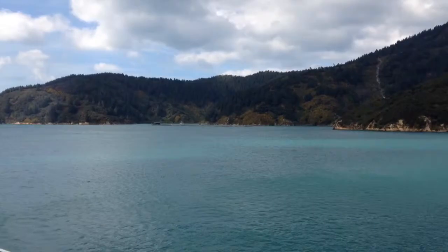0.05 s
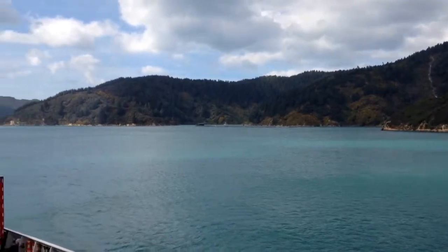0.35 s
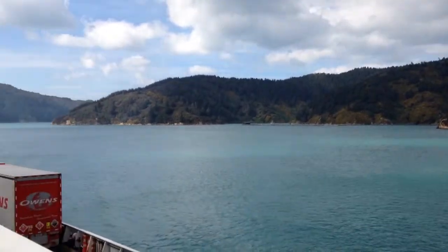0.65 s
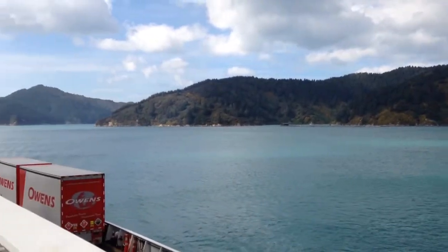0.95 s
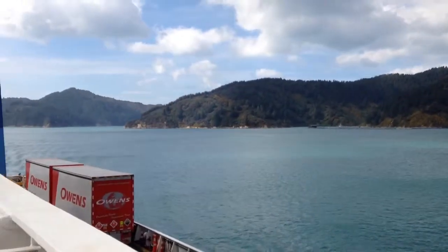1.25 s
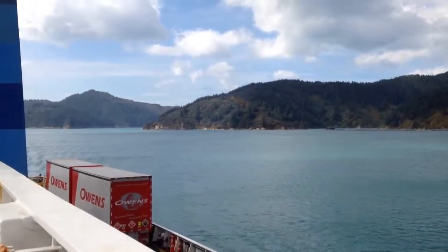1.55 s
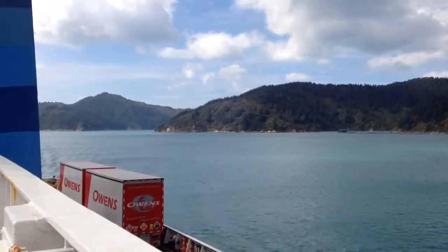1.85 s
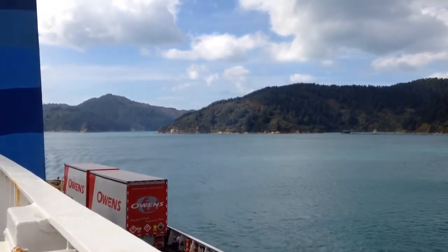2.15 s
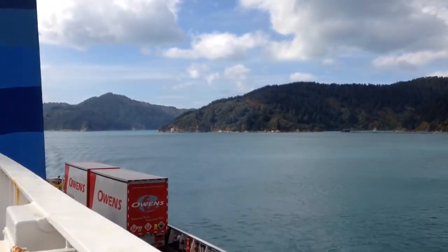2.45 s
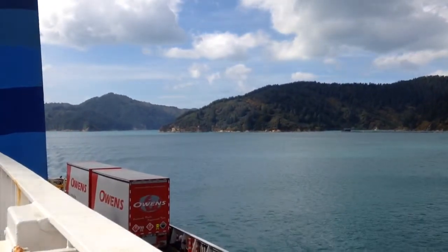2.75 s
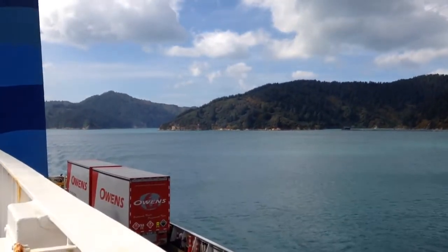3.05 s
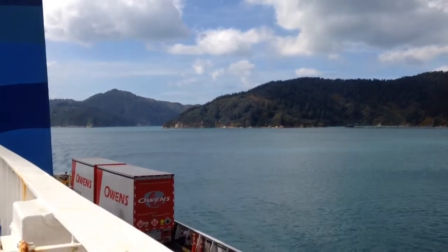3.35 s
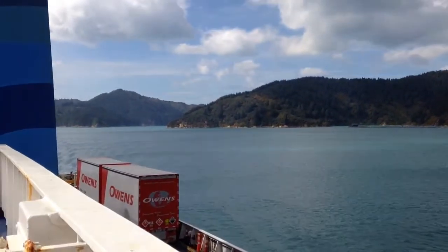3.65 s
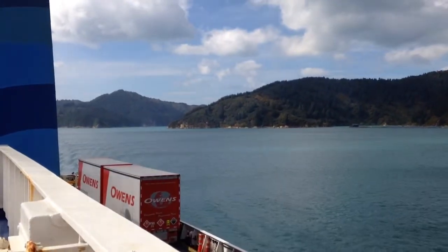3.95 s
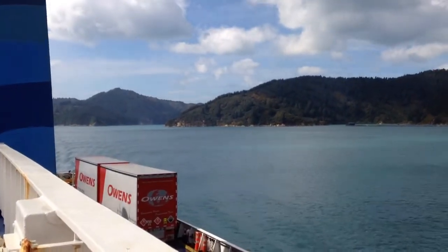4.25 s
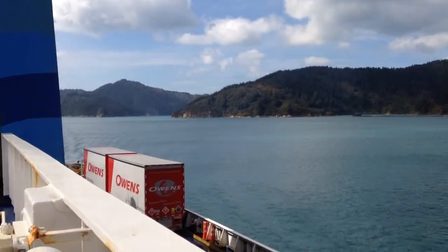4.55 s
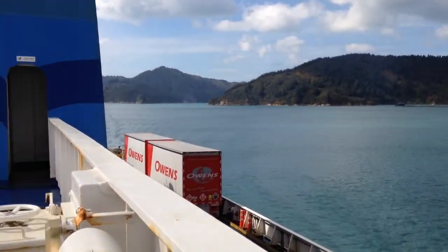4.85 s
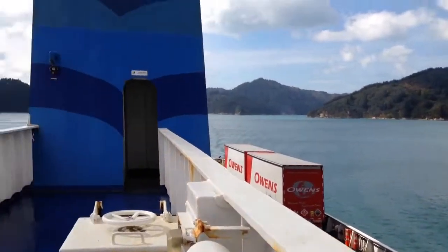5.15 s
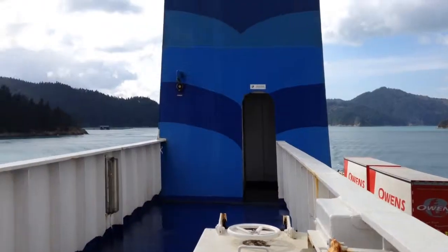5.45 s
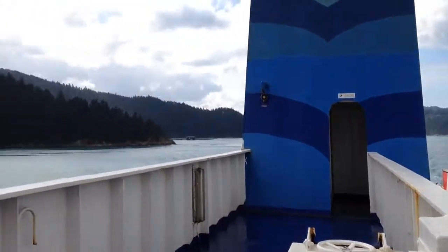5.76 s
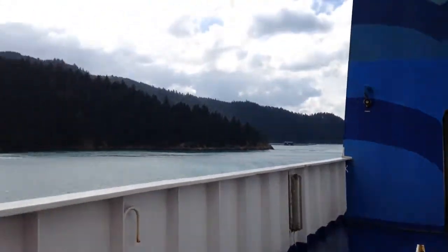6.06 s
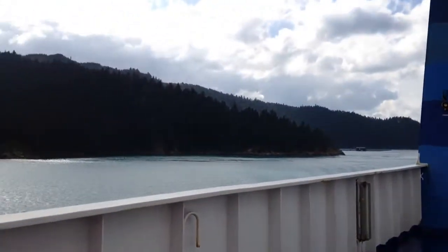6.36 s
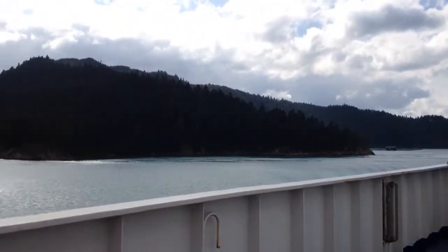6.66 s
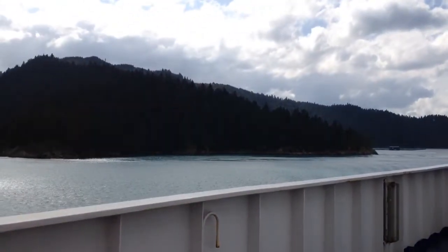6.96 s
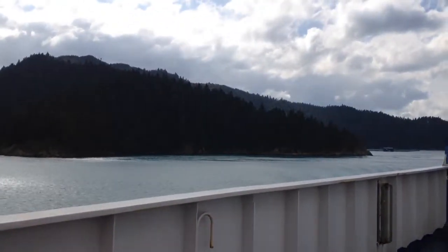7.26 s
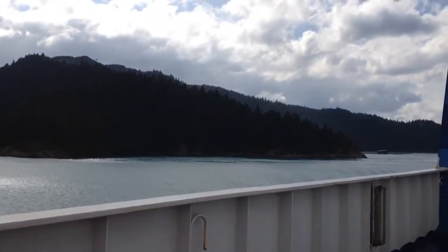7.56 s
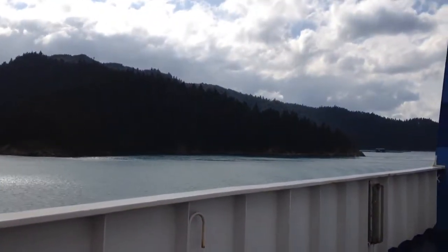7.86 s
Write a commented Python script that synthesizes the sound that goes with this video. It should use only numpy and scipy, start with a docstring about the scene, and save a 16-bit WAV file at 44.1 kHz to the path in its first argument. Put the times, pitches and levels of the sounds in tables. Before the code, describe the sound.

A quick cluster of bumps, wind thumps and a pop hits a handheld microphone on a ship's deck. Behind it runs a constant low engine throb with the hum and rush of ventilation and tumbling wind. Another pop comes about halfway through. Faint clothing rustles follow as the funnel's drone sinks for a moment, and it comes back near the end with more knocks and short buffets.

```python
"""The open deck of a ferry under way in calm water. From the start a big diesel throbs in the funnel,
ducts drone, ventilators roar and hum, and wind tumbles over the microphone. In the first half second a
hand knocks on the camera amid hard buffets and a pop of air. A buffet and a knock follow, then a second
pop at 4.4 s. Cloth rustles close by as the camera turns past the funnel and the drone sinks, until
7.2 s; it returns under the last knocks and buffets."""
import sys
import numpy as np
from scipy import signal
from scipy.fft import rfft, irfft
from scipy.io import wavfile

SR = 44100
rng = np.random.default_rng(int(sys.argv[2]) if len(sys.argv) > 2 else 0)


def unload_wav(signal):
    """Save mono or channel-first audio to the path in sys.argv[1] as 16-bit WAV at rate SR, clipped to [-1, 1]."""
    wavfile.write(
        sys.argv[1],
        SR,
        np.round(np.clip(np.atleast_2d(signal).T, -1, 1) * 32767).astype(np.int16),
    )


N = 352800
TIME = np.arange(N) / SR


def diesel(cycle_hz=4.2165, first_throb_s=0.01532):
    """Harmonic series: every third order is locked to the firing; unequal cylinders add the rest."""
    # exhaust harmonics: multiple of the cycle rate, level/dB
    orders = [(8, -46), (9, -41), (11, -42), (12, -30), (13, -37.5), (14, -38.5), (15, -29.5), (16, -45),
              (17, -38), (19, -46), (20, -45), (23, -47), (24, -35), (27, -47)]
    cycles = cycle_hz * (TIME - first_throb_s) + 0.0045 * drift(0.84)
    out = np.zeros(N)
    for order, level_db in orders:
        offset = rng.random() * (order % 3 > 0)  # orders left in phase beat together as the throb
        out += partial(order * cycles + offset, level_db, waver_db=2.5)
    return out


def ducts():
    """Air-column resonance: gas flow sets funnel and ducts droning around the notes of the blowers."""
    # blower tones: f/Hz, level/dB
    tones = [(189.5, -39.5), (394, -40), (405.5, -41)]
    # modes of funnel and ducts: f/Hz, bandwidth/Hz, level/dB
    modes = [(177, 11, -41.5), (188.5, 10, -36.5), (199.8, 8, -38.5), (232.9, 8.8, -41.5),
             (298.6, 10.3, -40), (319.2, 10.2, -40), (362, 24, -38.5), (402.3, 18.5, -43.5),
             (589.1, 14, -44.5), (730, 15, -49), (808, 12, -52.5), (1006, 75, -55)]
    blowers = sum(partial(hz * TIME + 0.19 * drift(2.8), db, waver_db=1.5) for hz, db in tones)
    return blowers + sum(from_db(db) * resonant_noise(hz, width) for hz, width, db in modes)


def ventilators(hum_db, shaft_hz=29.65, rush_db=-28):
    """Fan noise: shaft and blades hum at harmonics of the rotation, within a broadband rush of air."""
    # hum: multiple of the shaft rate, level/dB
    harmonics = [(1, -42.5), (3, -37), (4, -38.5), (9, -40), (20, -50), (27, -55.5)]
    # spectrum of the rush: f/Hz, relative density/dB
    rush = [(22, -11), (40, 3), (80, 11.5), (150, 0), (220, 3), (380, 0), (480, 0), (680, -5.5), (1000, -6),
            (1600, -13.5), (2400, -16.5), (3000, -28.5), (3800, -37.5), (5500, -40), (9000, -50),
            (15000, -62)]
    turns = shaft_hz * TIME + 0.017 * drift(1.3)
    hum = sum(partial(order * turns + rng.random(), db, waver_db=2.1) for order, db in harmonics)
    return from_db(hum_db) * hum + from_db(rush_db) * coloured_noise(rush)


def wind(breeze_db=-27, wander_db=0.5, lumpy_db=2.0):
    """Turbulent pressure: eddies pass the microphone in lumps whose size follows gusts and lulls."""
    # spectrum of the turbulence: f/Hz, relative density/dB
    turbulence = [(20, -26), (45, -0.5), (90, -1), (200, -2), (350, -9), (600, -15), (1200, -29),
                  (3000, -51)]
    # gusts (+) and lulls (-): t/s, change/dB, half length/s
    gusts = [(0.425, -22, 0.037), (0.758, 5.5, 0.18), (0.876, -17, 0.036), (5.65, -4, 0.33),
             (6, 4.5, 0.081), (6.78, 3, 0.11), (7.288, -11, 0.06), (7.723, -3, 0.08), (7.99, 5, 0.05)]
    level_db = breeze_db + wander_db * drift(2.5)
    level_db += sum(change_db * swell(s, length) for s, change_db, length in gusts)
    return from_db(level_db + lumpy_db * drift(13.5)) * coloured_noise(turbulence)


def buffets(flutter=0.28, sag_octaves=0.19):
    """Forced vibration: a strong eddy drives the membrane in uneven swings that slow as it passes."""
    # strong eddies: t/s, level/dB, f/Hz, half length/s, puff against the swings/dB
    eddies = [(0.235, -9.5, 235, 0.0094, -12), (0.314, -16.5, 250, 0.016, -4),
              (0.357, -25.5, 587, 0.022, -9), (1.141, -18.5, 215, 0.018, -20),
              (6.289, -30.5, 406, 0.0078, 9.5), (7.532, -9.5, 175, 0.0064, -19),
              (7.83, -13, 185, 0.015, -24)]
    # puff of finer turbulence: f/Hz, relative density/dB
    puff_spectrum = [(200, 7.5), (600, 9), (1200, -6), (2500, -20), (4000, -41), (10000, -63)]
    puff = coloured_noise(puff_spectrum)
    unevenness = np.exp(flutter * np.tanh(drift(220)))
    out = np.zeros(N)
    for s, level_db, hz, length, puff_db in eddies:
        sag = 2 ** (-sag_octaves * np.tanh((TIME - s) / length))
        cycles = np.cumsum(hz * sag * unevenness) / SR
        cycles -= np.interp(s, TIME, cycles)  # centre a trough on the eddy
        pressure = from_db(puff_db) * puff - np.cos(2 * np.pi * cycles)
        out += from_db(level_db) * swell(s, length) * pressure
    return out


def pops(dull_hz=620, snap_hz=1750, tick_hz=6000, port_hz=2980, port_t60_s=0.0067):
    """Impulse excitation: air slaps with a snap and a one-sided pulse, and the microphone port rings."""
    # slaps of air: t/s, level/dB
    slaps = [(0.328, -3), (4.416, -13.5)]
    out = np.zeros(N)
    for s, level_db in slaps:
        age = np.maximum(TIME - s, 0)
        rise = 2 * np.pi * dull_hz * age
        pulse = (rise / 3) ** 3 * np.exp(3 - rise)
        port = from_db(-27 - 60 * age / port_t60_s) * np.sin(2 * np.pi * port_hz * age)
        snap = from_db(-11) * swing(s, snap_hz, cycles=0.31)
        tick = from_db(-31) * swing(s, tick_hz, cycles=0.31)
        out += from_db(level_db) * (pulse - port + snap + tick)
    return out


def knocks(cycles=0.69, edge_ratio=2.7, edge_db=-22):
    """Heavy damping: the held camera body answers each touch with one swing and a faint hard edge."""
    # contacts of the hand: t/s, level/dB, f/Hz
    contacts = [(.2243, -13, 230), (.2301, -7.5, 317), (.2328, -17.5, 1250), (.2412, -6.5, 189),
                (.296, -15, 950), (.3022, -13, 400), (.3058, -6, 490), (.3118, -20, 1100),
                (.3175, -13, 560), (.3221, -16, 304), (1.528, -20, 700), (5.942, -16, 715),
                (6.281, -17, 900), (6.2865, -16.5, 450), (6.292, -17, 560), (7.3215, -6, 533),
                (7.328, -16, 240), (7.752, -16, 536)]
    out = np.zeros(N)
    for s, level_db, hz in contacts:
        edge = from_db(edge_db) * swing(s, edge_ratio * hz, cycles)
        out += from_db(level_db) * (swing(s, hz, cycles) + edge)
    return out


def cloth(rest_db=-83.5, grain_db=2.0, uneven_db=0.9, sheen_hz=11000, relative_width=0.56):
    """Stick-slip friction: fibres catch and let go, hissing in slow rubs and a few quick brushes."""
    # spectrum of the rubbing: f/Hz, relative density/dB
    hiss = [(2000, -5.5), (4500, 1), (9000, -4.5), (11000, -6.5), (12500, -2), (14000, -4), (15000, -5.5)]
    # slow rubs: t/s, level/dB, half length/s
    rubs = [(0.16, -66, .07), (1.77, -74, .16), (2.16, -71, .09), (3.1, -70, .1), (3.58, -71, 0.16),
            (4.84, -63.5, 0.19), (4.98, -64, .04), (5.25, -74, .04), (5.6, -67, 0.09), (5.8, -71, .1),
            (6.18, -66, .04), (6.416, -61, 0.075), (6.8, -68.5, 0.5), (7.28, -69, .08), (7.7, -71, 0.52)]
    # brushes: t/s, level/dB, rise/s, fall/s, centre f/Hz, sheen against the brush/dB
    brushes = [(.66, -49.5, 0.022, 0.024, 2500, -33), (5.641, -50.5, .005, 0.023, 5400, -4),
               (6.048, -50.5, 0.018, 0.02, 5400, -10), (6.40, -58, .05, .07, 3900, -14),
               (6.63, -64, .06, .1, 3900, -20), (6.85, -61.5, .08, .12, 4600, -17),
               (7.1, -68, .1, .3, 3700, -18.5)]
    rub_power = from_db(rest_db) ** 2
    rub_power += sum((from_db(db) * swell(s, length)) ** 2 for s, db, length in rubs)
    out = np.sqrt(rub_power) * from_db(uneven_db * drift(14)) * coloured_noise(hiss)
    sheen = resonant_noise(sheen_hz, relative_width * sheen_hz)
    for s, level_db, rise, fall, hz, sheen_db in brushes:
        stroke = np.exp(-(np.minimum(TIME - s, 0) / rise) ** 2 - np.maximum(TIME - s, 0) / fall)
        brush = resonant_noise(hz, relative_width * hz) + from_db(sheen_db) * sheen
        out += from_db(level_db) * stroke * brush
    return out * rms_one(from_db(grain_db * drift(150)))


def shell(rubbing):
    """Structural resonance: the thin camera shell lifts a few narrow bands of whatever rubs on it."""
    # shell modes: f/Hz, bandwidth/Hz, lift/dB
    modes = [(4850, 380, 2.5), (5750, 300, 1.2), (8300, 450, 2.5), (10500, 400, 4.5), (11300, 400, 2.5)]
    out = rubbing.copy()
    for hz, width, lift_db in modes:
        band = signal.lfilter(*signal.iirpeak(hz, hz / width, fs=SR), rubbing)
        out += (from_db(lift_db) - 1) * band
    return out


def partial(cycles, level_db, waver_db):
    """Amplitude modulation: moving air makes the level of one machine tone waver."""
    return np.sqrt(2) * from_db(level_db + waver_db * drift(0.6)) * np.cos(2 * np.pi * cycles)


def coloured_noise(spectrum):
    """Spectral shaping: noise of rms 1 follows the given spectrum and rolls off beyond its ends."""
    hz, level_db = np.transpose(spectrum)
    bins = np.maximum(np.arange(N // 2 + 1) * SR / N, 1)
    gain = from_db(np.interp(np.log(bins), np.log(hz), level_db))
    ends = np.minimum(bins / hz[0], 1) ** 2 * np.minimum(hz[-1] / bins, 1) ** 2
    return rms_one(irfft(rfft(rng.standard_normal(N)) * gain * ends, N))


def resonant_noise(hz, width):
    """Random excitation of one resonance with steep skirts; rms 1."""
    edges = np.clip([hz - width / 2, hz + width / 2], 10, .45 * SR)
    band = signal.butter(2, edges, "band", fs=SR, output="sos")
    return rms_one(signal.sosfilt(band, rng.standard_normal(N)))


def drift(hz):
    """Low-pass noise: a random fluctuation with a spread of about 1."""
    step, settle = 40, 2000  # samples per point; points for the filter to settle
    pole = np.exp(-2 * np.pi * step * hz / SR)
    white = rng.standard_normal(N // step + settle + 2)
    slow = signal.lfilter([1], [1, -2 * pole, pole * pole], white)[settle:]
    return np.interp(np.arange(N) / step, np.arange(len(slow)), rms_one(slow))


def swell(s, half_length):
    """Gaussian envelope: 1 at time s, 1/e a half length to either side."""
    return np.exp(-((TIME - s) / half_length) ** 2)


def swing(s, hz, cycles):
    """Wave packet: one push and rebound of height 1, its half length given in cycles."""
    return -swell(s, cycles / hz) * np.cos(2 * np.pi * hz * (TIME - s))


def from_db(db):
    """Decibel law: 20 dB is a tenfold amplitude."""
    return 10 ** (np.asarray(db) / 20)


def rms_one(x):
    """Normalisation to unit power."""
    return x / np.sqrt(np.mean(x ** 2) + 1e-20)


def gain_control(x, threshold_db, share, release_db_per_s, attack_hz):
    """Compression: loud peaks push the gain down by a share of their excess; it creeps back up."""
    over_db = share * np.maximum(20 * np.log10(np.abs(x) + 1e-9) - threshold_db, 0)
    release_db = release_db_per_s * TIME
    held_db = np.maximum.accumulate(over_db + release_db, axis=-1) - release_db
    pole = np.exp(-2 * np.pi * attack_hz / SR)
    return x * from_db(-signal.lfilter([1 - pole], [1, -pole], held_db))


def scene():
    """Superposition: ship, wind, handling and cloth add at one microphone."""
    # gain of the duct drone, lower once the camera has turned past the funnel: t/s, gain/dB
    facing = [(0, 1.5), (.45, -1), (2, 2), (5.4, 2.05), (6.2, -1.5), (7.2, -5), (8, 1)]
    # brief dips of the throb: t/s, depth/dB
    dips = [(.42, 8), (4.56, 17), (6.45, 10), (7.5, 2.5)]
    facing_db = np.interp(TIME, *np.transpose(facing))
    dip_db = sum(depth_db * swell(s, half_length=0.096) for s, depth_db in dips)
    throb_db = -0.3 + 0.29 * facing_db - dip_db  # throb and hum follow the turn only in part
    hum_db = -1.7 + 0.51 * facing_db
    ship = from_db(throb_db) * diesel() + from_db(facing_db) * ducts() + ventilators(hum_db)
    air = wind() + buffets() + pops()
    return (ship + air + knocks() + shell(cloth()))[None]


def record(dry, cutoff_hz=15300, fade_s=0.004):
    """Compression and band limiting: peaks are held down, the ends softened and the top cut."""
    held = gain_control(dry, threshold_db=-7, share=.55, release_db_per_s=10, attack_hz=12)
    ends = np.minimum(np.minimum(TIME, TIME[::-1]) / fade_s, 1)
    low_pass = signal.ellip(10, .2, 80, cutoff_hz, fs=SR, output="sos")
    return signal.sosfilt(low_pass, held * ends)


dry = scene()
out = record(dry)
unload_wav(out)
```